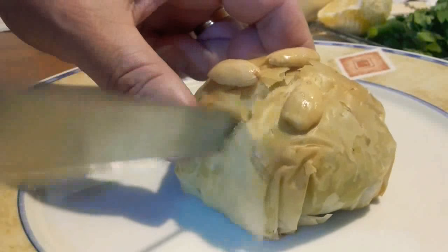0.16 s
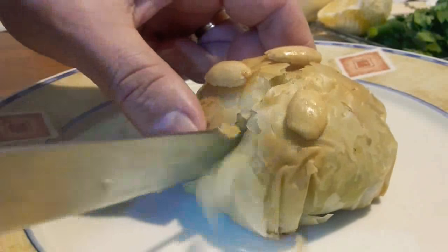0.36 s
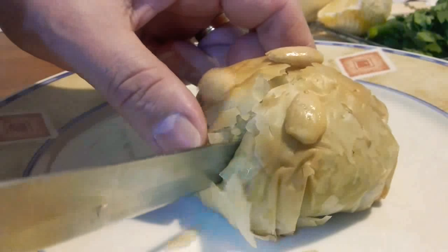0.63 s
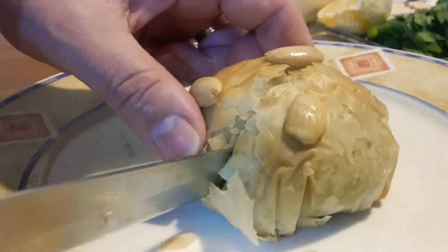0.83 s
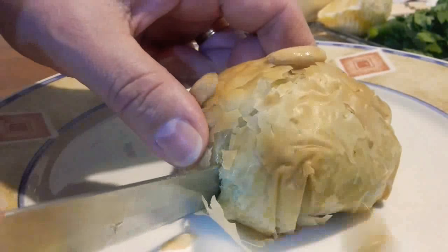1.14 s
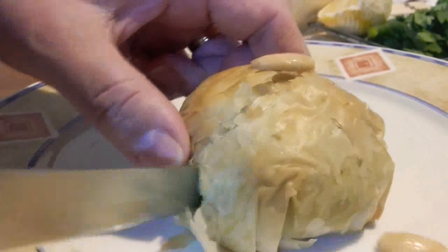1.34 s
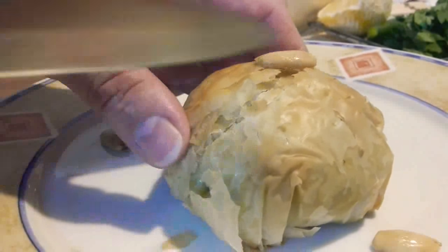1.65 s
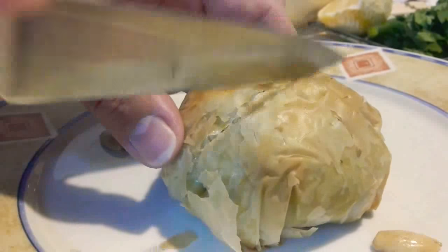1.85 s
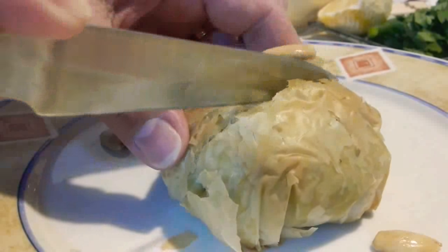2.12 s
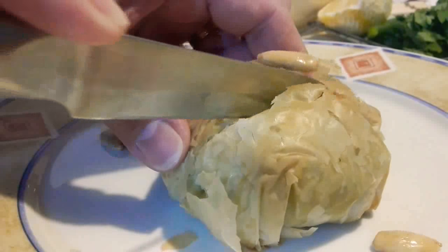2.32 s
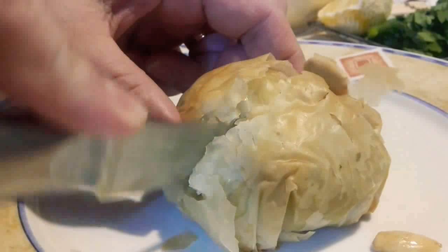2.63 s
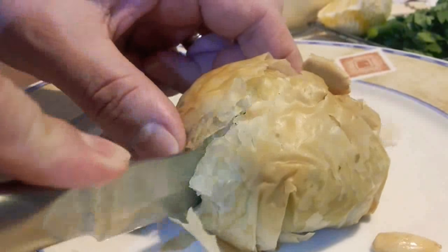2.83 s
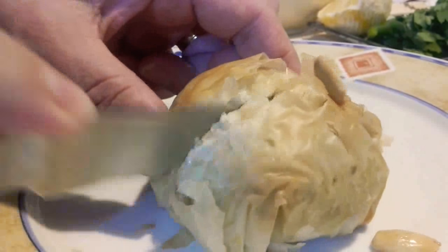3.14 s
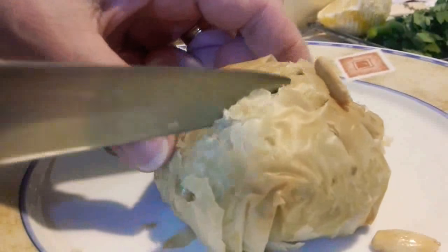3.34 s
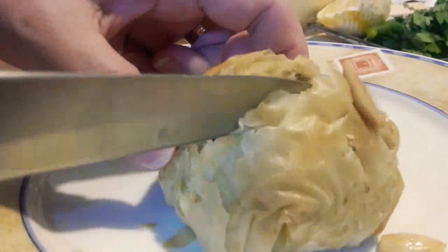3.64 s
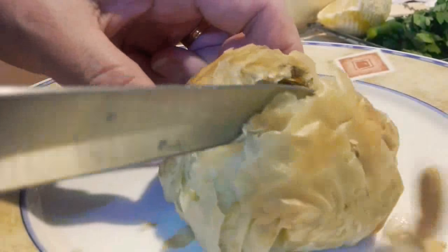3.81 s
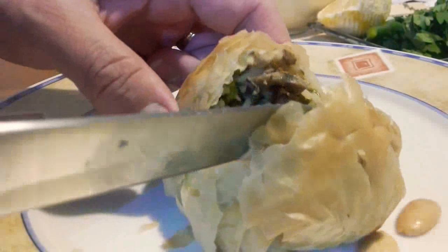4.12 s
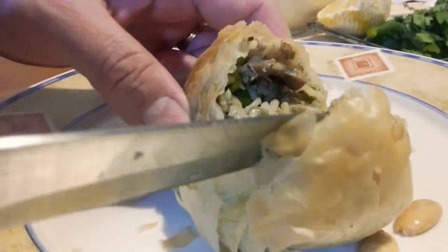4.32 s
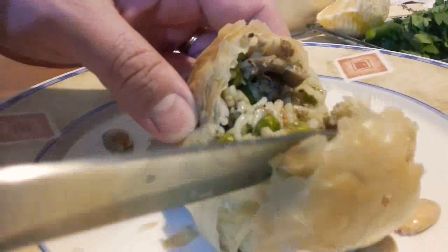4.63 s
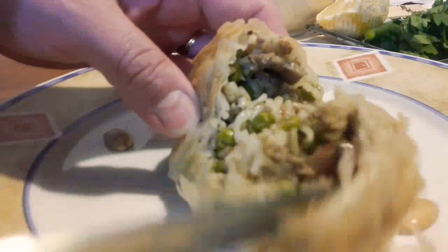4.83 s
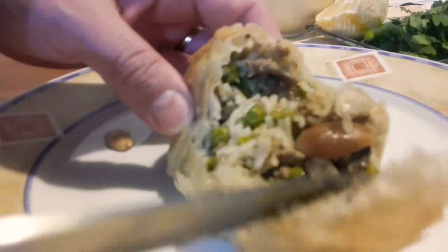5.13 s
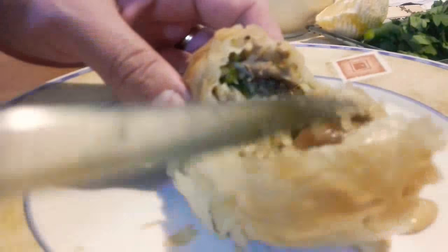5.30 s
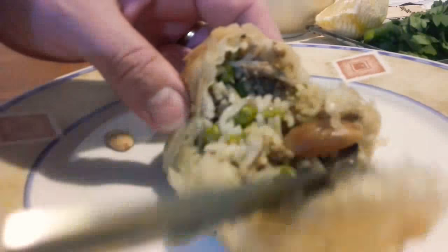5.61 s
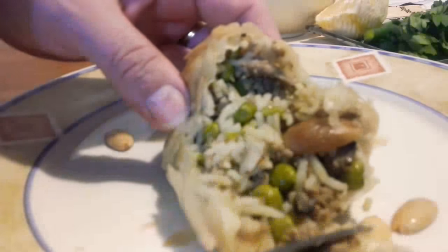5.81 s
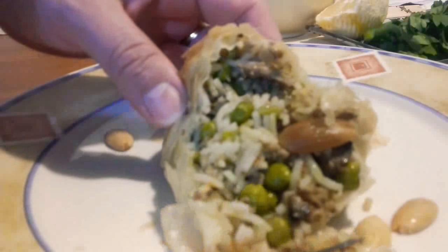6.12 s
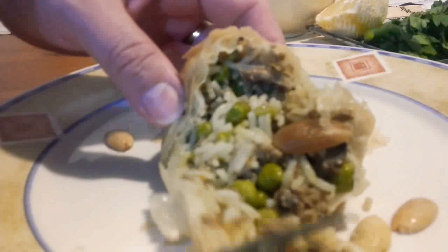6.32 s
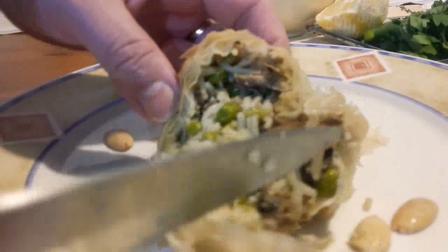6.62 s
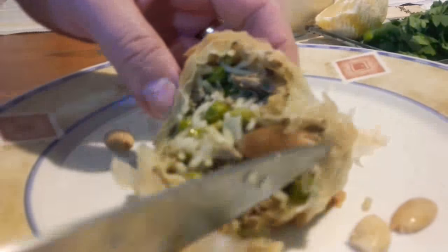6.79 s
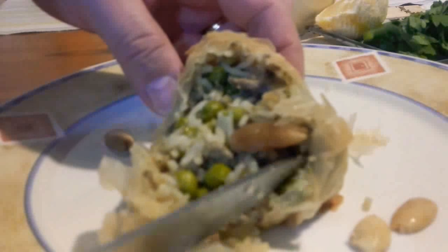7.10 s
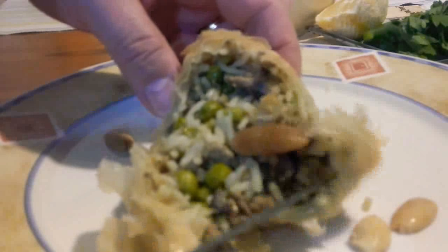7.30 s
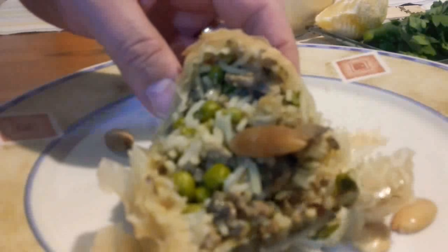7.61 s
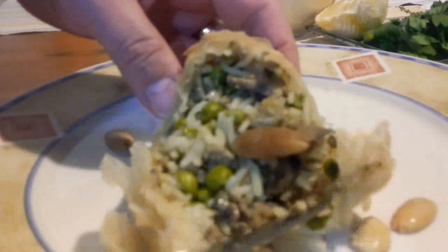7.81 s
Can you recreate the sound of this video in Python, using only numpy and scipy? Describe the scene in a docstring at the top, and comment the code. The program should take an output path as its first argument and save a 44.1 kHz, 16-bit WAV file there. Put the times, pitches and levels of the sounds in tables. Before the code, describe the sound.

A knife saws through crisp flaky pastry, crackling and snapping in bright bursts, while blade and falling nuts clink on a china plate.

```python
"""A knife saws through a crisp pastry parcel: the crust cracks and crackles in bright bursts, its hollow shell booms.
Shaped noise rings flakes and shell for the cracks; uneven random clicks make the finer crackle.
Blade and falling nuts knock and scrape a china plate, built from damped modes; the steel edge rings twice.
Low resonances thud as the table takes the pressure, and a wall clock ticks once a second.
It is all heard close up in a quiet room, with a short diffuse tail and steady air noise."""
import sys
import numpy as np
from scipy import signal
from scipy.fft import rfft, irfft
from scipy.io import wavfile

SR = 44100
rng = np.random.default_rng(int(sys.argv[2]) if len(sys.argv) > 2 else 0)


def bounce(signal):
    """Save signal as a 16-bit WAV file at the path given by the first command-line argument."""
    frames = np.transpose(np.atleast_2d(signal))
    limited = np.clip(frames, -1, 1)
    pcm = np.round(limited * 32767).astype(np.int16)
    wavfile.write(sys.argv[1], SR, pcm)


N = 350595

# the loudest crust cracks: [t/s, peak level/dB, shell boom level/dB over that peak]
CRACKS = [(0.192, -42.5, -1), (0.242, -22.5, -11), (0.2673, -30, 2), (0.288, -7.5, -14), (0.4224, -32, -13),
          (0.525, -33, -15), (0.6213, -28, -15), (0.658, -21, -14.5), (0.694, -28, -15),
          (0.7393, -17, -13.5), (0.814, -17.5, -9), (0.917, -23, -7.5), (0.9747, -16.5, -7.5),
          (0.9784, -6.5, -17.5), (0.985, -28, -34), (1.142, -28, -13), (1.148, -14.5, -9.5),
          (1.1581, -16, -27), (1.249, -21.5, -15), (1.5893, -24.5, -9), (1.946, -36.5, -5.5),
          (1.958, -24, -8.5), (2.0967, -20.5, -8.5), (2.1201, -15, -18), (2.1406, -23, -9),
          (2.165, -24, -7), (2.179, -32, -3), (2.237, -27.5, -6), (2.2537, -25, -8), (2.2676, -25.5, -3.5),
          (2.281, -29.5, 4.5), (2.3067, -23, -15), (2.3318, -22, -9.5), (2.344, -36, -14),
          (2.378, -41, 5.5), (2.394, -38, -13), (2.4125, -22.5, -10.5), (2.467, -38, -2), (2.485, -35, 3),
          (2.492, -33.5, -2), (2.5094, -22.5, -7), (2.52, -20.5, -8.5), (2.56, -12, -27),
          (2.587, -15.5, -14), (2.619, -20, -14), (2.701, -28, -37), (2.728, -32, -22), (2.741, -26, -39),
          (2.864, -28.5, -14), (3.584, -36.5, -5.5), (3.721, -26.5, -11.5), (3.8642, -28, -7.5),
          (3.9151, -20.5, -12.5), (3.9337, -25, -19), (4.2367, -19.5, -22.5), (4.3261, -17, -19),
          (4.3398, -20, -35), (4.3786, -21.5, -16.5), (4.562, -24, -25), (4.5805, -15.5, -21.5),
          (4.637, -23, -31), (4.652, -9.5, -36), (4.6956, -16.5, -27), (4.7445, -19.5, -27),
          (4.7905, -15, -22.5), (4.811, -9, -35), (4.8407, -20.5, -36), (4.8862, -11, -44),
          (4.9109, -16, -36), (4.9247, -20.5, -38), (5.005, -23.5, -15), (5.2295, -29.5, -18.5),
          (5.722, -28, -17.5), (5.797, -33.5, -24), (5.9064, -25, -15.5), (5.9762, -22.5, -28),
          (6.0136, -29, -37), (6.0884, -21, -51), (6.1423, -25.5, -19.5), (7.141, -35, -35),
          (7.202, -32.5, -15), (7.2665, -25, -17), (7.2829, -25, -24), (7.321, -20, -35),
          (7.35, -20.5, -21), (7.3739, -16.5, -24), (7.401, -15.5, -29), (7.4114, -19, -40),
          (7.432, -17, -24), (7.438, -13.5, -45), (7.458, -11.5, -42), (7.475, -18, -37),
          (7.489, -13.5, -25), (7.524, -25, -16), (7.556, -12.5, -29), (7.6462, -26.5, -23),
          (7.914, -40, -29)]
# colour of a fresh crack: [f/Hz, level/dB per Hz]
CRUST_COLOUR = [(1470, -27.5), (2450, 3.5), (3100, -3), (6200, -5), (10400, 1.5), (15500, -3)]
# resonances of the hollow pastry shell: [f/Hz, width/Hz, level/dB]
SHELL = [(560, 1800, 7), (1120, 800, 11.5), (2050, 410, -1.5)]
OPENED_S, WHOLE_PITCH = 1.2, 1.3   # until the first cut is through, the whole shell booms higher (ratio)
# smaller breaks around each crack: time window, mean level per unit of size, ring to -60 dB
SPLINTER_SPAN_S, SPLINTER_DB, SPLINTER_CYCLES = 0.0158, -10, 1.1
SPLINTER_LEAD = 0.26   # share of the window that lies before the crack


def cracks():
    """Each crack tears briefly: a flake ring over a broad snap, a shell boom, and three pitched splinters close by."""
    out, t = np.zeros(N + 2000), np.arange(2000) / SR
    tears = rng.standard_normal((len(CRACKS), 2000))
    draws = rng.random((len(CRACKS), 10))
    for (s, peak_db, boom_db), tear, (pitch, *splinters) in zip(CRACKS, tears, draws):
        snap = coloured(np.gradient(tear) * t * np.exp(-t / 0.00033), CRUST_COLOUR, taps=32)
        flake_hz = 8000 + 7000 * pitch
        flake = ring(tear * t * np.exp(-t / 0.00083), flake_hz, 7.6 / flake_hz)
        bright = snap / np.abs(snap).max() + 0.27 * flake / np.abs(flake).max()
        bright *= from_db(peak_db) / np.abs(bright).max()

        shell_pitch = WHOLE_PITCH if s < OPENED_S else 1
        shell = np.multiply(SHELL, [shell_pitch, 1, 1])   # scales every shell frequency
        boom = resonate(tear * np.exp(-t / 0.0028), shell)
        boom *= from_db(peak_db + boom_db) / np.abs(boom).max()
        out[round(s * SR):][:2000] += bright + boom

        for when, size, tone in np.reshape(splinters, (3, 3)):
            chip_hz = 4000 * 4 ** tone
            chip = ring(tear * np.exp(-t / 0.00025), min(chip_hz, 15000), SPLINTER_CYCLES / chip_hz)
            chip *= from_db(peak_db + (1.0 + size) * SPLINTER_DB) / np.abs(chip).max()
            chip_s = s + (when - SPLINTER_LEAD) * SPLINTER_SPAN_S
            out[round(chip_s * SR):][:2000] += chip
    return out[:N]


# pushes of the blade through the crust:
# [start t/s, length/s, crackle level/dB, its change by the end/dB, shell rumble level/dB]
STROKES = [(0.0, 0.0098, -50, -3, -51), (0.228, 0.042, -54, 16.5, -53.5), (0.373, 0.19, -56, -15.5, -70),
           (0.639, 0.36, -57.5, 7, -56.5), (1.017, 0.55, -58, 6, -54), (1.976, 0.025, -58, -3, -57),
           (2.112, 0.16, -46.5, -6.5, -51), (2.265, 0.31, -54.5, 14, -50), (2.673, 0.21, -69, 15.5, -60),
           (3.098, 0.032, -64, 4.5, -66), (3.531, 0.31, -66.5, 12.5, -66), (3.91, 0.22, -52, 8.5, -54),
           (4.185, 0.21, -55, 0, -61.5), (4.53, 0.21, -64, 11.5, -62), (4.808, 0.14, -52, 10, -58),
           (5.138, 0.2, -64.5, 2, -77), (5.725, 0.073, -56, 3.5, -65.5), (5.891, 0.27, -56.5, -2.5, -65.5),
           (6.376, 0.14, -66.5, -5.5, -76.5), (6.777, 0.039, -70, 1.5, -88), (7.208, 0.26, -63, 7, -66.5),
           (7.422, 0.17, -41.5, -15, -57), (7.71, 0.36, -66, 1.5, -77)]
STROKE_RISE_DB_PER_S, STROKE_FALL_DB_PER_S = 489, 204


def sawing_levels():
    """Each push of the blade lifts the crackle and the shell rumble together."""
    start, length, first_db, change_db, shell_db = np.transpose(STROKES)
    edges = STROKE_RISE_DB_PER_S, STROKE_FALL_DB_PER_S
    crackle_db = swells(start, length, first_db, first_db + change_db, *edges)
    rumble_db = swells(start, length, shell_db, shell_db, *edges)
    return crackle_db, rumble_db


def crackle(crackle_db, rumble_db):
    """Small flakes break all along the blade, dealt out over ten pitches, and shake the shell."""
    flakes = grains(per_s=1200, spread_db=5.0, clump_db=6.5)
    dealt = rng.integers(0, 10, N)
    rings = 0
    for k, hz in enumerate(np.geomspace(3000, 15000, 10)):
        rings = rings + rms_one(ring(flakes * (dealt == k), hz, 20.0 / hz))
    bright = rms_one(coloured(2.2 * flakes + 0.29 * rings, CRUST_COLOUR))
    pushes = 0.6 * flakes + grains(per_s=350, spread_db=4.0, clump_db=6.0)
    rumble = rms_one(resonate(pushes, SHELL))
    return from_db(crackle_db) * bright + from_db(rumble_db) * rumble


# the edge drags over the china: [start t/s, length/s, strength level/dB]
SCRAPES = [(0.273, 0.023, -93), (1.34, 0.27, -90.5), (2.53, 0.068, -85), (3.951, 0.22, -81.5),
           (4.776, 0.14, -75.5), (7.411, 0.16, -80)]
SCRAPE_RISE_DB_PER_S, SCRAPE_FALL_DB_PER_S = 250.5, 146


def scrape_level():
    """The drag of the edge swells up, holds and falls away."""
    start, length, drag_db = np.transpose(SCRAPES)
    return swells(start, length, drag_db, drag_db, SCRAPE_RISE_DB_PER_S, SCRAPE_FALL_DB_PER_S)


# knocks on the plate: [t/s, strength level/dB, extra level/dB on the 1.5 kHz modes,
# extra level/dB on the free modes, hardness as level/dB one octave above 2.5 kHz]
KNOCKS = [(0.884, -36.5, 11.5, -11, -7), (1.098, -37.5, 5, -5, -9), (1.245, -36, -27, -7, 14),
          (1.2537, -23, -27, -10, -21), (1.2842, -29.5, -32, -5.5, 9), (1.333, -30, -2, 4.5, 11),
          (1.3435, -38, -17, -6.5, 14), (1.3594, -17, 13, -2, 3.5), (1.382, -22.5, 4, -2, -2),
          (1.3962, -31.5, -18, 6.5, 3), (1.424, -31.5, 5, -1.5, 6), (1.4643, -21.5, -20, 2.5, 2),
          (1.467, -26, 10.5, -3, 11), (1.5381, -26, -1, -8, 2.5), (1.5663, -34.5, -6, -2, 10),
          (2.412, -34.5, -10, -9, -18), (2.5607, -36, 3, -7, -16), (2.727, -44.5, 4, -6.5, -6),
          (2.831, -42.5, -2, 2, 0), (3.783, -49.5, 16.5, 4, -4), (3.909, -20, -32, 0.5, -1.5),
          (3.939, -31.5, -20, 2, 0), (3.987, -32, -12, 12.5, 6), (3.9925, -22, 2, 6, 5.5),
          (4.063, -30.5, -22, 1, -0.5), (4.0907, -28.5, -22, -0.5, -1), (4.1547, -41, 11, -12.5, -15),
          (4.3262, -42.5, 12, -6.5, 16), (4.9489, -36.5, 4, -3, -13), (5.004, -30, 0, -14, -23),
          (5.8963, -41.5, -10, 1, 0), (7.321, -35, 6, -4, -19), (7.4038, -23, 5.5, -17, -19),
          (7.422, -36, 8, -7, -16), (7.4372, -24.5, 7, -7, -16), (7.475, -32.5, 8, -18, -12),
          (7.521, -49, 18, -24, -14), (7.558, -32, 5.5, -17, -27)]
# plate mode pitches: [f/Hz]
PLATE_HZ = [515, 1097, 1510, 1528, 1696, 2315, 2425, 2470, 3030, 3665, 3935, 4912, 5335, 6015, 7200]
# the same modes in the same order: [level/dB, t60/s]
PLATE_MODES = [(-21, 0.56), (-17, 0.21), (-12, 0.15), (-7, 0.18), (-19, 0.42), (-15, 0.1), (0, 0.13),
               (-4, 0.18), (-7.5, 0.098), (-8, 0.12), (-11, 0.104), (-20, 0.11), (-22, 0.12),
               (-21.5, 0.078), (-26.5, 0.11)]
# modes that food and blade hardly damp: [f/Hz]
FREE_HZ = [515, 1097, 1696, 3935, 4912, 6015]
LASTING_SHARE, DAMPED_T60_SHARE = .2, .28   # gain of the lasting ring; t60 of the damped ring as a share of the mode's
SCRAPE_HARDNESS_DB = -7.5   # one octave above 2.5 kHz


def plate(scrape_db):
    """Knocks strike every mode, hard ones the high modes more, and chatter on; the scraping edge keeps a murmur."""
    s, peak_db, extra_db, free_db, hardness = np.transpose(KNOCKS)
    at, out = np.round(s * SR).astype(int), np.zeros(N)
    scrape = from_db(scrape_db) * grains(per_s=250, spread_db=5, clump_db=5)
    chatter = from_db(-32) * grains(per_s=600, spread_db=2, clump_db=3)
    spot_db = 2.0 * rng.standard_normal((len(at), len(PLATE_MODES)))   # each blow lands on another spot
    sides = rng.choice([-1, 1], spot_db.shape)   # and on either side of the fine nodal lines
    signs = (-1) ** np.cumsum(np.diff(np.log2(PLATE_HZ), prepend=0) > .2)   # close modes move together
    for k, (hz, (level_db, t60)) in enumerate(zip(PLATE_HZ, PLATE_MODES)):
        free = hz in FREE_HZ
        height = np.sqrt(np.log2(max(hz, 2500) / 2500))
        strength_db = peak_db - 6 + hardness * height
        strength_db = strength_db + extra_db * (abs(hz - 1500) < 100) + free_db * free
        blows = np.zeros(N)
        blows[at] = from_db(strength_db + spot_db[:, k]) * (sides[:, k] if free or hz > 3500 else 1)
        if hz < 2600:   # the low modes take the push of the whole contact
            blows = signal.lfilter(np.hanning(9) / 4, 1, blows)
        after = signal.lfilter([1], [1, -np.exp(-1 / SR / 0.012)], blows)   # contacts that follow each blow
        contacts = blows + after * chatter + from_db(SCRAPE_HARDNESS_DB * height) * scrape
        # food and blade damp the ring: most of it dies fast, the rest wavers on, the free modes least
        waver = flutter(per_s=110, depth_db=1.5 if free else 4.5)
        lasting = waver * ring(contacts, hz, t60)
        damped = ring(contacts, hz, DAMPED_T60_SHARE * t60)
        out += signs[k] * from_db(level_db) * (LASTING_SHARE * lasting + damped)
    soften = signal.butter(2, 6000, fs=SR, output="sos")   # contacts are not quite hard
    return signal.sosfilt(soften, high_passed(out, hz=450))


# ringing of the thin steel: [f/Hz, level/dB, t60/s]
BLADE_MODES = [(9560, 0, .1), (10930, -8, .05), (12250, -12, .05)]
# the edge meets bare china: [t/s, strength level/dB]
BLADE_RINGS = [(1.4655, -41), (1.5372, -50)]


def blade():
    """Hard knocks set the steel itself ringing, high and wavering."""
    s, strength_db = np.transpose(BLADE_RINGS)
    blows = np.zeros(N)
    blows[np.round(s * SR).astype(int)] = from_db(strength_db)
    return sum(from_db(db) * flutter(per_s=110, depth_db=3) * ring(blows, hz, t60) for hz, db, t60 in BLADE_MODES)


# jolts of the table top: [t/s, strength level/dB, extra level/dB on the top resonance]
THUDS = [(0.263, -49, 2.5), (0.967, -36.5, 4), (1.371, -59, 16.5), (1.408, -58.5, 19), (1.529, -61, 11),
         (2.15, -53, 7), (2.424, -40, 2), (2.516, -39.5, -2), (2.594, -41, 5), (2.722, -44.5, 2.5),
         (4.885, -57, 10), (4.957, -62, 16.5), (7.414, -46, 3.5)]
# table resonances: [f/Hz, width/Hz, level/dB]
TABLE_MODES = [(127, 17, -4), (191, 19, -3), (277.1, 12, 6.5)]
THUD_PUSH_S, LUMPS_UNDER_RUMBLE_DB = 0.0019, -11


def table(rumble_db):
    """Jolts thud into the table top, and the sawing comes through as small low lumps."""
    s, strength_db, top_db = np.transpose(THUDS)
    t = np.arange(2000) / SR
    push, thuds = t * np.exp(-t / THUD_PUSH_S), 0
    for modes, db in ((TABLE_MODES[:-1], strength_db), (TABLE_MODES[-1:], strength_db + top_db)):
        jolts = np.zeros(N)
        jolts[np.round(s * SR).astype(int)] = from_db(db)
        thuds = thuds + resonate(signal.fftconvolve(jolts, push)[:N], modes)
    thuds = thuds / np.abs(resonate(push, TABLE_MODES)).max()
    lumps = rms_one(resonate(grains(per_s=31, spread_db=3.0, clump_db=3.0), TABLE_MODES))
    return thuds + from_db(rumble_db + LUMPS_UNDER_RUMBLE_DB) * lumps


# resonances of the clock case: [f/Hz, level/dB, t60/s]
CLOCK_MODES = [(776, -12, 0.12), (847, -9, 0.066), (1010, -2.5, 0.011), (1259, 0, 0.018),
               (1456, -12, 0.018), (1994, -3.5, 0.018)]
CLOCK_FIRST_S, CLOCK_DB = .48, -54.5


def clock():
    """Once a second a soft rattle of the movement rings the case."""
    rattle, t = np.zeros(N), np.arange(4000) / SR
    shape = t / 0.012 * np.exp(-t / 0.019) * 0.11
    for s in np.arange(CLOCK_FIRST_S, N / SR - .1, 1):
        rattle[round(s * SR):][:4000] = rng.standard_normal(4000) * shape
    return from_db(CLOCK_DB) * sum(from_db(db) * ring(rattle, hz, t60) for hz, db, t60 in CLOCK_MODES)


OPPOSITE_DB = -19


def opposite_treble(near):
    """A faint smeared treble above 4.3 kHz, opposite in the two channels."""
    smear = rng.standard_normal(300) * np.exp(-np.arange(300) / 80)
    treble = signal.sosfilt(signal.butter(8, 4300, "high", fs=SR, output="sos"), near)
    smeared = from_db(OPPOSITE_DB) * signal.fftconvolve(treble, smear / np.linalg.norm(smear))[:N]
    return smeared * [[1], [-1]]


# decay of the room: [f/Hz, t60/s]
ROOM_T60 = [(200, 0.88), (1500, 0.19), (6000, 0.17), (14000, 0.19)]
ROOM_DB = -9


def room(x):
    """A diffuse tail in octave bands, each dying at its own rate."""
    t, tail = np.arange(SR // 2) / SR, 0
    for low in 62.5 * 2. ** np.arange(8):
        octave = signal.butter(2, [low, 2 * low], "band", fs=SR, output="sos")
        band = signal.sosfilt(octave, rng.standard_normal(len(t)))
        tail = tail + band * from_db(-60 * t / at_hz(ROOM_T60, low * np.sqrt(2)))
    tail *= 1 - np.exp(-t / 0.00011)   # the first echoes need a moment
    return from_db(ROOM_DB) * signal.fftconvolve(x, tail / np.sqrt(np.sum(tail ** 2)))[:N]


# colour of the air noise: [f/Hz, level/dB per Hz]
AIR_COLOUR = [(18, -19), (30, -9.5), (55, -18), (270, -11), (1330, -16.5), (1510, -15), (2420, -20),
              (4420, -29.5), (10200, -26), (15500, -24.5)]
AIR_DB = -68   # rms


def air():
    """Steady noise, coloured as the air of the room."""
    return from_db(AIR_DB) * rms_one(coloured(rng.standard_normal(N), AIR_COLOUR, taps=512))


def from_db(db):
    """Decibels to gain."""
    return 10 ** (np.asarray(db) / 20)


def rms_one(x):
    """Scale to rms 1."""
    return x / np.sqrt(np.mean(x ** 2) + 1e-20)


def at_hz(points, hz):
    """Read a table on a log-frequency axis."""
    return np.interp(np.log(hz), np.log(np.array(points)[:, 0]), np.array(points)[:, 1])


def coloured(x, spectrum, taps=256):
    """Minimum-phase filter with the given spectrum, so nothing sounds early."""
    hz = np.maximum(np.fft.rfftfreq(taps * 16, 1 / SR), 10)
    cepstrum = irfft(np.log(from_db(at_hz(spectrum, hz))))
    # folding the cepstrum forward gives minimum phase
    cepstrum[1:taps * 8] *= 2
    cepstrum[taps * 8 + 1:] = 0
    return signal.fftconvolve(x, irfft(np.exp(rfft(cepstrum))))[:len(x)]


def ring(clicks, hz, t60):
    """A unit click sets a decaying sine of height 1 ringing."""
    r = from_db(-60 / (t60 * SR))
    w = 2 * np.pi * min(hz, .45 * SR) / SR
    return signal.lfilter([0, np.sin(w)], [1, -2 * r * np.cos(w), r * r], clicks + 1e-18)


def resonate(x, peaks):
    """Parallel resonances of [f/Hz, width/Hz, level/dB], signs alternating."""
    return sum((-1) ** k * from_db(db) * width * ring(x, hz, np.log(1000) / np.pi / width)
               for k, (hz, width, db) in enumerate(peaks))


def grains(per_s, spread_db, clump_db):
    """Random clicks of very uneven size that come in clumps; rms 1."""
    clumps = np.repeat(rng.standard_normal(N // 400 + 1), 400)[:N]
    born = rng.random(N) < per_s * from_db(clump_db * clumps) / SR
    size = from_db(spread_db * np.minimum(rng.exponential(1, N), 4))
    return rms_one(born * size * rng.choice([-1, 1], N))


def flutter(per_s, depth_db):
    """A gain that wavers at random."""
    knots = rng.standard_normal(int(N / SR * 200))
    return from_db(depth_db * np.interp(np.arange(N) / SR * min(per_s, 190), np.arange(len(knots)), knots))


def high_passed(x, hz):
    """Small things radiate no deep bass."""
    return signal.sosfilt(signal.butter(2, hz, "high", fs=SR, output="sos"), x)


def swells(start, length, first_db, last_db, rise_db_per_s, fall_db_per_s):
    """Level in dB of the loudest gesture at each moment: steady rise, a sloping hold, steady fall."""
    t = np.arange(N)[:, None] / SR
    held = first_db + (last_db - first_db) * np.clip((t - start) / length, 0, 1)
    rise = rise_db_per_s * np.maximum(start - t, 0)
    fall = fall_db_per_s * np.maximum(t - start - length, 0)
    return np.max(held - rise - fall, axis=1)


def scene():
    """Pastry, plate, blade, table and clock up close, then a faint treble in opposite phase, the room and its air."""
    crackle_db, rumble_db = sawing_levels()
    small = cracks() + crackle(crackle_db, rumble_db) + plate(scrape_level()) + blade() + clock()
    thuds = high_passed(high_passed(table(rumble_db), hz=100), hz=100)
    near = high_passed(small, hz=259.2) + thuds
    return near + opposite_treble(near) + room(near) + air()


OFFSET, CUTOFF_HZ = -.0005, 15850


def record(dry):
    """The top is cut steeply and a small constant offset added."""
    return signal.sosfilt(signal.ellip(10, .5, 60, CUTOFF_HZ, fs=SR, output="sos"), dry) + OFFSET


dry = scene()
out = record(dry)
bounce(out)
```